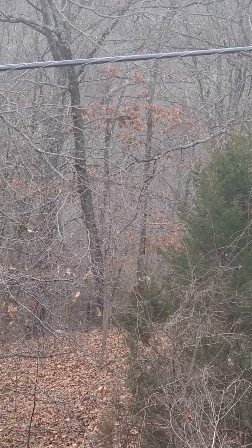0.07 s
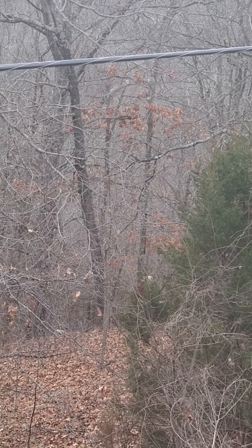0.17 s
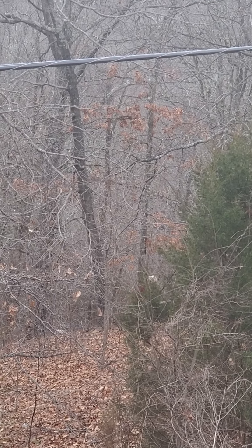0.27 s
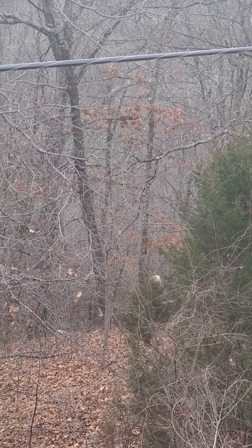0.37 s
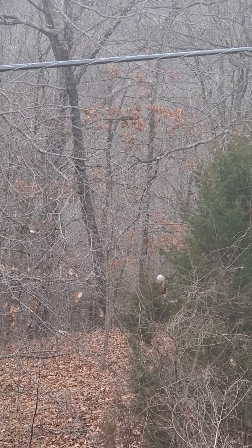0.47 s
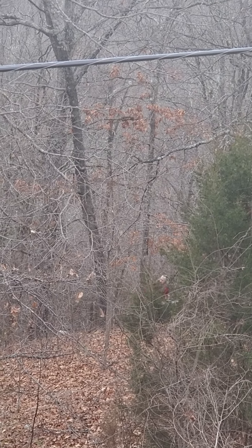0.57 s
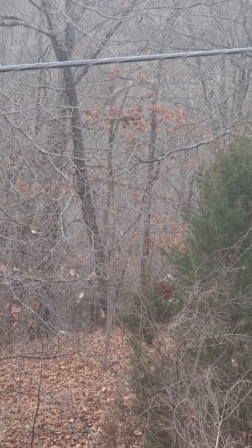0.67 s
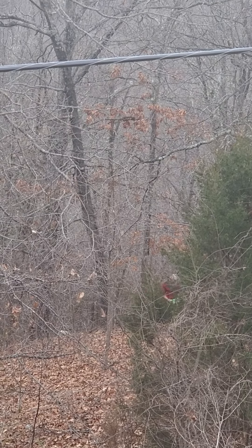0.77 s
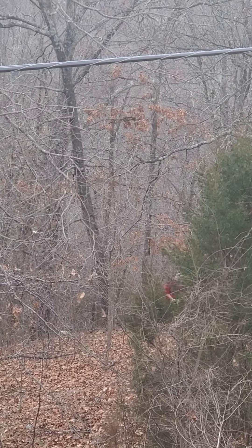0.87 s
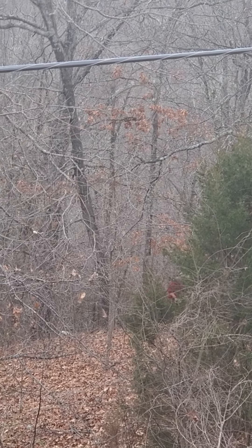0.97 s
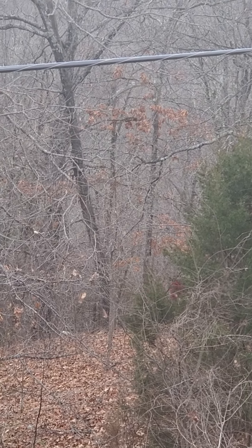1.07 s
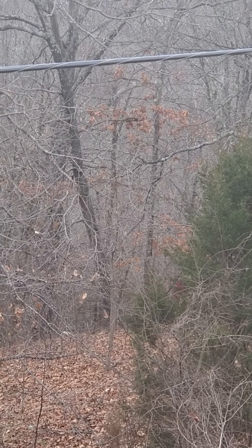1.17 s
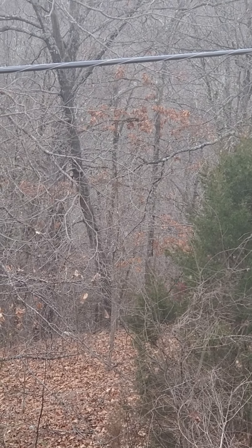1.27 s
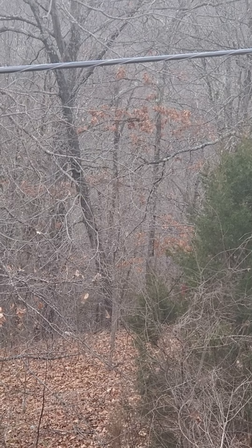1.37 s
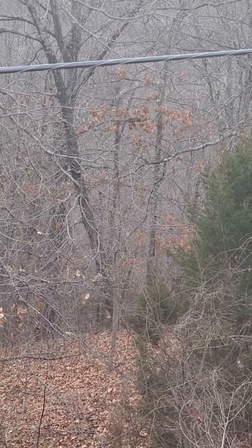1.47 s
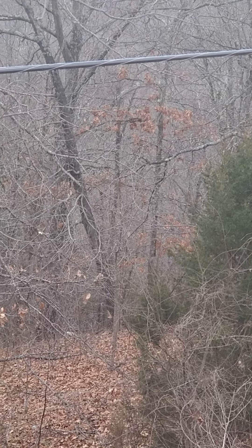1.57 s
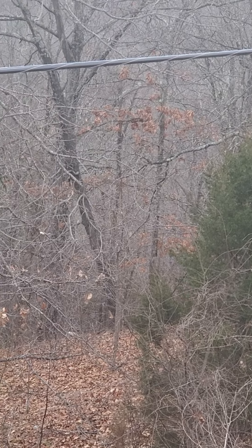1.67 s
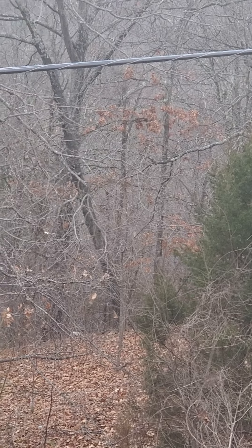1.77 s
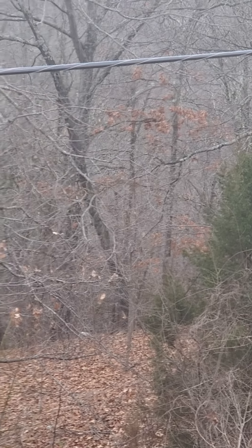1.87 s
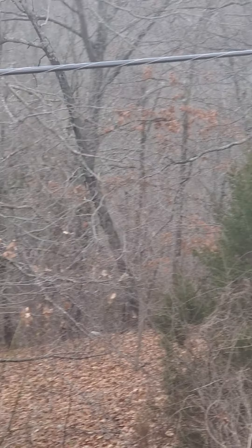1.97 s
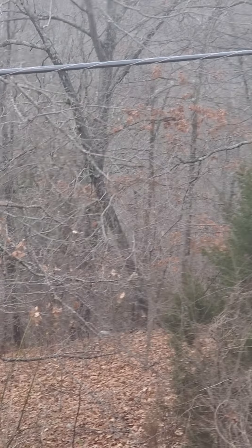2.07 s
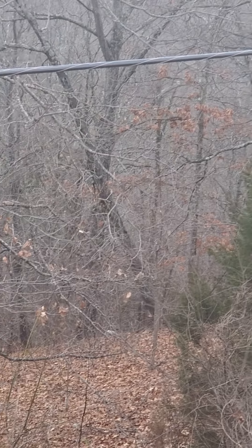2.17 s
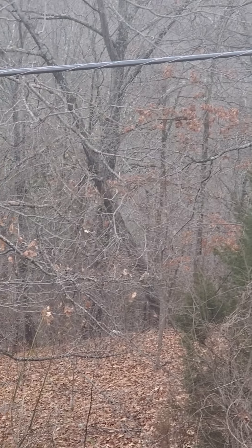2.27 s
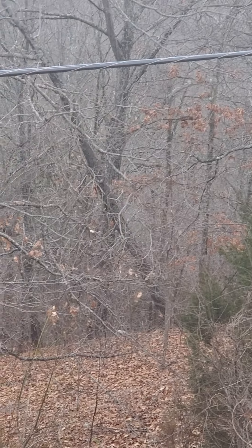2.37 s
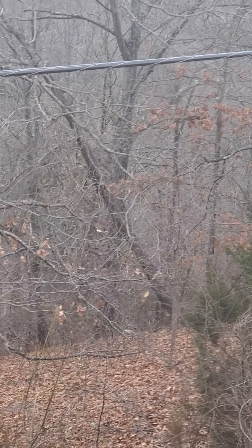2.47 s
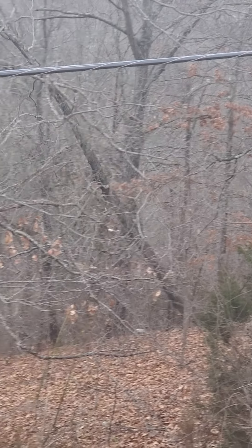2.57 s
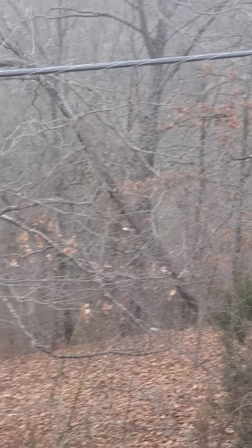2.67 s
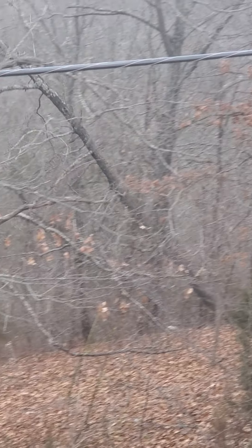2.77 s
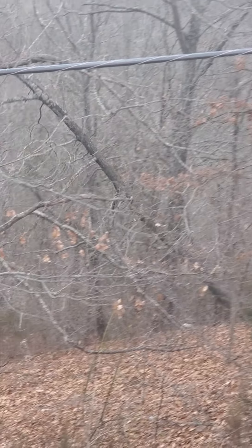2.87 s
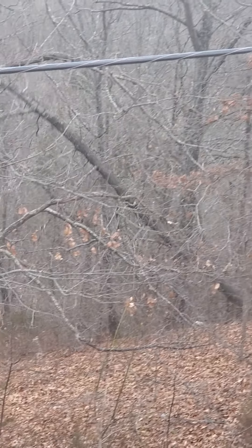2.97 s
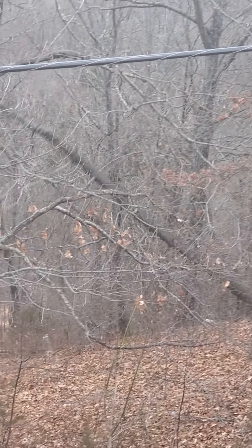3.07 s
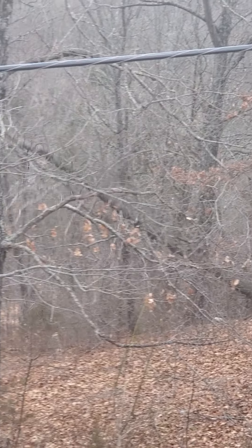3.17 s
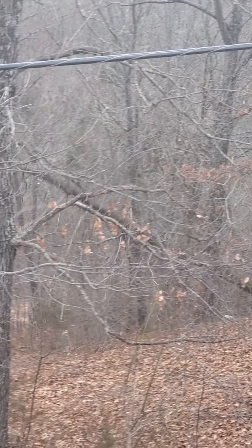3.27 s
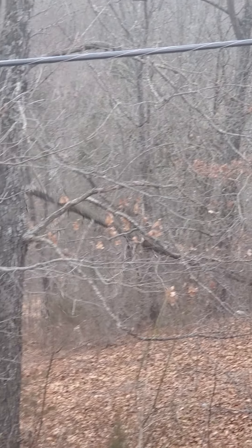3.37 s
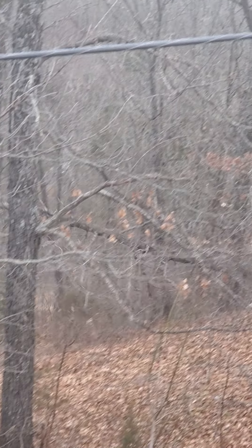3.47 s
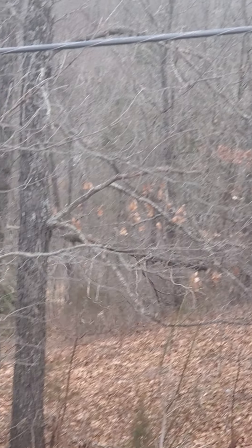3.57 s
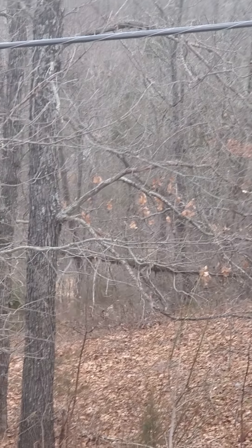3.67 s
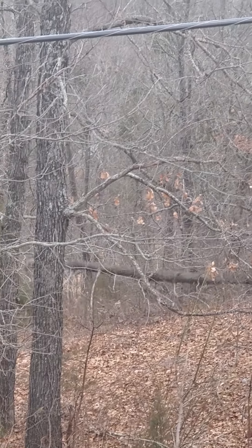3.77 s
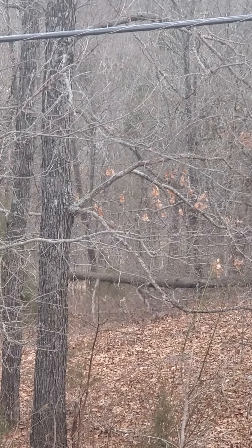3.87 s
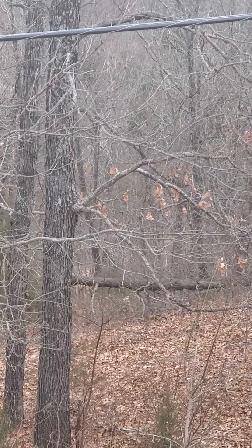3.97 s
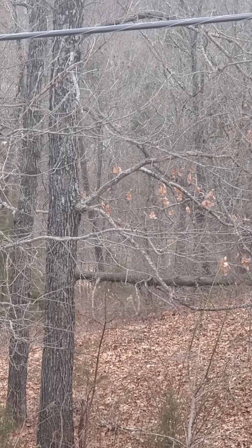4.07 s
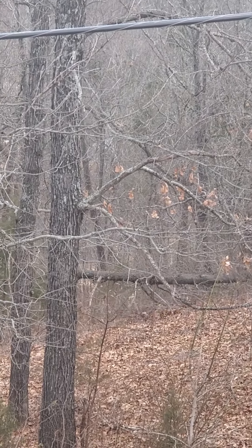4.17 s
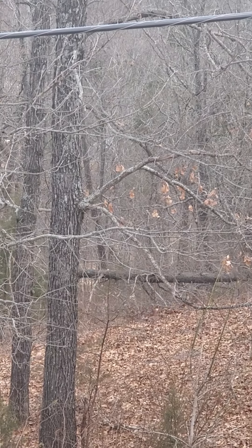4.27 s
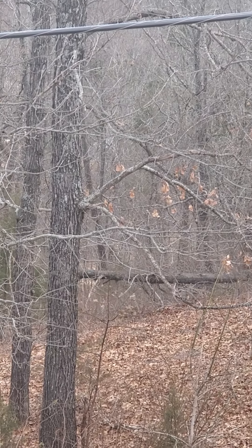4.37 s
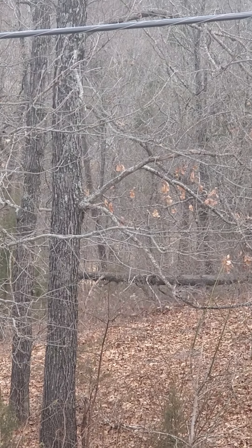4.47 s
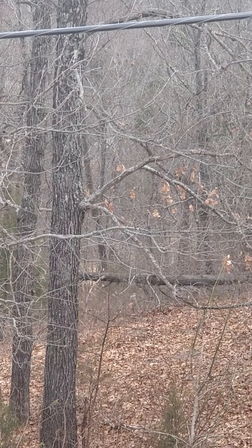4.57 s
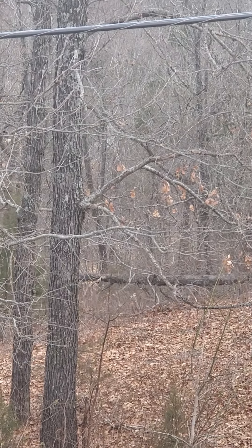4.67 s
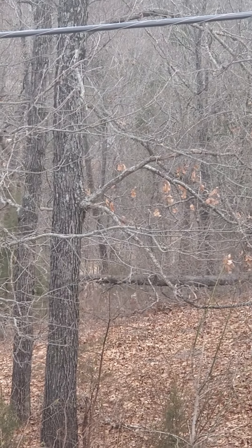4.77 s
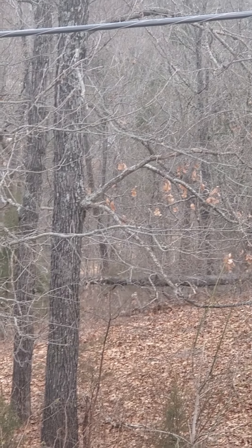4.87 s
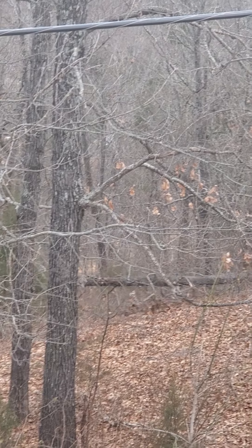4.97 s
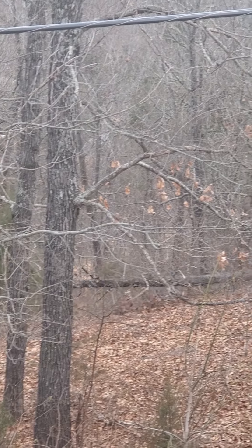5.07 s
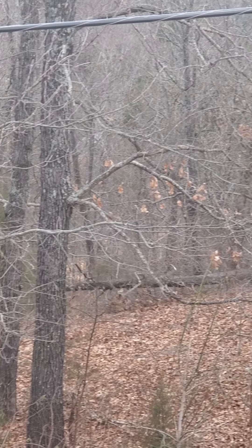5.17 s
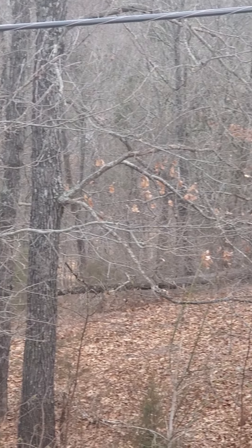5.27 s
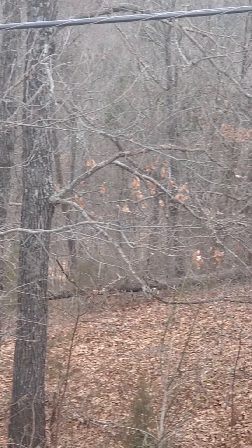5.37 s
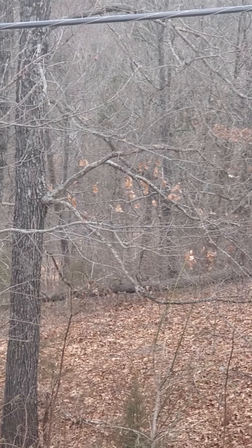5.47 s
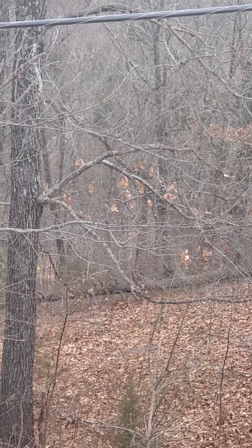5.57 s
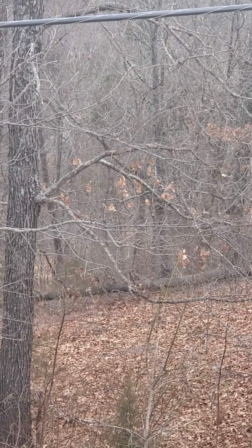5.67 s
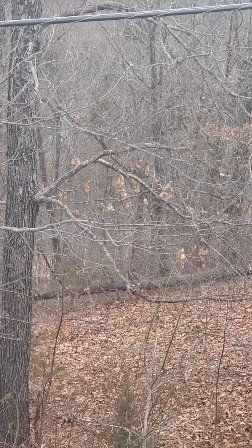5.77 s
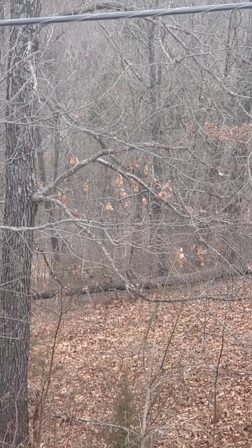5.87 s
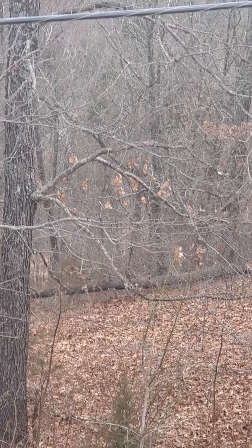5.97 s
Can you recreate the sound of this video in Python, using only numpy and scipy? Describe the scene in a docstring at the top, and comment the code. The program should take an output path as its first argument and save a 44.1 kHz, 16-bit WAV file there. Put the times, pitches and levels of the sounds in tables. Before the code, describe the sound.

Bare winter woods, heard from some distance in stereo, with a low, soft road rumble throughout. At the start the hollow echo of a far knock dies away; dry leaves crunch very faintly up to about 1 s, with two tiny twig ticks. From 1.04 s the trunk cracks: sharp, ringing, irregular snaps with short woodland echoes, over a growing patter of tearing fibres. A short gap in the cracks after 1.85 s, then more from 2.2 s, the hardest at 2.55 s; tearing stops near 2.75 s. Around 3.1-3.3 s the crown brushes lightly through branches. From 3.5 s limbs snap and the first thud lands, swelling to the loudest crash at 3.75-4.1 s: shattering twigs, leaf hiss, knocking boughs, heavy low blows. It drops quickly. A weaker crackling surge follows at 4.4-4.65 s, a strong snap at 4.8 s, smaller snaps from 5.2 s and a last rustling crackle at 5.4-5.6 s, fading.

```python
"""A felled tree goes over in bare winter woods, some way down a slope from a pair of microphones.
The hinge of its trunk cracks fibre by fibre; the crown sweeps through other trees, crashes to the ground and
settles with limbs snapping. Snaps are ringing noise bursts with echoes off the trunks around; crackles are crowds of
small bursts; thuds are short sines over shuddering soil. Dry leaves crunch near the stump, the echo of a far
knock dies away, and filtered noise makes the distant traffic."""
import sys
import numpy as np
from scipy import signal
from scipy.fft import rfft, irfft, next_fast_len
from scipy.io import wavfile
from scipy.ndimage import map_coordinates

SR = 44100
rng = np.random.default_rng(int(sys.argv[2]) if len(sys.argv) > 2 else 0)


def put_to_file(sound):
    """Save the sound as 16-bit audio at rate SR, in the file named by the first command-line argument."""
    columns = np.atleast_2d(sound).T  # one column per channel
    safe = np.clip(columns, -1, 1)
    whole_steps = np.round(safe * 32767)
    wavfile.write(sys.argv[1], SR, whole_steps.astype(np.int16))


N = 265349


def amp(db):
    """Decibels to gain."""
    return 10 ** (np.asarray(db) / 20)


def unit(x):
    """Scale to rms 1, over both channels together."""
    return x / np.sqrt(np.mean(x ** 2) + 1e-20)


def along(points, hz):
    """(Hz, value) points read on a log frequency axis."""
    f, v = np.transpose(points)
    return np.interp(np.log(hz + 1), np.log(f + 1), v)


def wobble(rate, size):
    """A smooth random curve with rate knots a second."""
    knots = rng.standard_normal(int(size * rate / SR) + 4)
    return map_coordinates(knots, [np.arange(size) * rate / SR])


def swell(start, end, rise_db, fall_db):
    """A gain that rises to 1 at start, holds until end and falls; slopes in dB a second."""
    t = np.arange(N) / SR
    before, after = np.maximum(start - t, 0), np.maximum(t - end, 0)
    return amp(-abs(rise_db) * before - abs(fall_db) * after)


def together(levels):
    """Unrelated sounds add in power."""
    return np.sqrt(sum(level ** 2 for level in levels))


def add(out, s, x):
    """Mix x into out from time s."""
    i = max(round(s * SR), 0)
    out[:, i:i + x.shape[1]] += x[:, :max(N - i, 0)]


def filtered(x, response):
    """x times a response of frequency."""
    n = x.shape[-1]
    m = next_fast_len(n + 8192)
    return irfft(rfft(x, m) * response(np.fft.rfftfreq(m, 1 / SR)), m)[..., :n]


def resonance(hz, centre, width):
    """Band-pass response of one damped mode, 1 at its centre."""
    return 1j * hz * width / (centre ** 2 - hz ** 2 + 1j * hz * width)


def coloured(x, spectrum, tilt_db=0, size=2048):
    """Causal filter with this spectrum, tilted by tilt_db an octave between 700 and 7000 Hz."""
    hz = np.fft.rfftfreq(size, 1 / SR)
    octaves = np.log2(np.clip(hz, 700, 7000) / 2500)
    # folding the cepstrum onto positive time gives minimum phase, so attacks stay sharp
    cepstrum = irfft(np.log(amp(along(spectrum, hz) + tilt_db * octaves)))
    cepstrum[1:size // 2] *= 2
    cepstrum[size // 2 + 1:] = 0
    impulse = irfft(np.exp(rfft(cepstrum)))
    return signal.fftconvolve(x, impulse[None], axes=1)[:, :x.shape[1]]


def diffuse(size):
    """White noise arriving from all around, as the two microphones get it."""
    # Likeness of scattered sound at the two microphones. Each row: frequency in Hz, coherence.
    coherence = [(25, 0.34), (70, 0.98), (300, .97), (700, 0.57), (1500, 0.22), (3000, 0.37), (5000, 0.21),
                 (8000, 0.06), (15000, 0.14)]
    turn = lambda hz: np.arccos(np.clip(along(coherence, hz), -1, 1)) / 2
    mid_side = lambda hz: np.array([np.cos(turn(hz)), np.sin(turn(hz))])
    mid, side = filtered(rng.standard_normal((2, size)), mid_side)
    return np.array([mid + side, mid - side])


def rush(spectrum):
    """Diffuse noise of rms 1 with this spectrum."""
    return unit(filtered(diffuse(N), lambda hz: amp(along(spectrum, hz))))


def woods(lumpy_db=1.5, build_s=0.0055, size=32768):
    """A fresh reverberant tail: lumps of sound come back from trunk after trunk, building up over the first ms."""
    # Reverberation of the woods. Each row: frequency in Hz, time to fall by 60 dB in seconds.
    decay_times = [(200, 1), (1200, 0.84), (3500, 0.72), (8000, 0.73), (15000, 0.77)]
    hz, t, z = signal.stft(diffuse(size), SR, nperseg=256)
    decay = amp(-60 * t / along(decay_times, hz)[:, None])
    envelope = decay * (1 - np.exp(-t / build_s))
    tail = signal.istft(z * envelope, SR, nperseg=256)[1][:, :size]
    lumps = amp(lumpy_db * wobble(126.2, size))
    return unit(tail * lumps) / np.sqrt(size)  # mean energy 1 a channel


def fracture(t60, release, scatter_db, size=2048):
    """One break: a sharp release, brief splintering, and scatter from the nearest brush."""
    t = np.arange(size) / SR
    splinters = unit(rng.standard_normal(size) * amp(-60 * t / t60)) / np.sqrt(size)
    splinters[0] += release
    brush = unit(diffuse(size) * amp(-60 * t / 0.14)) / np.sqrt(size)
    return unit(splinters + amp(scatter_db) * brush) / np.sqrt(size)  # mean energy 1 a channel


def woody(x, ring_hz, boost=0.59, q=6):
    """A broken piece rings briefly in its main mode."""
    return filtered(x, lambda hz: 1 + boost * resonance(hz, ring_hz, ring_hz / q))


def snaps(table, spectrum, splinter_t60, release, level_db, woods_db, echo_db, count=176):
    """Single breaks, each with one strong echo and a tail from the woods; level is that of the first 4 ms."""
    # the echo comes from a nearby trunk, each time by a slightly different path
    echo_s, echo_spread, echo_spread_db = 0.0075, 0.2, 1
    # pieces ring, on the whole, a little below their brightness
    ring_ratio, ring_spread = 0.91, 0.18
    out = np.zeros((2, N))
    for (s, db, bright_hz), (ring, detour, loss) in zip(table, rng.standard_normal((len(table), 3))):
        # thicker wood sounds duller, rings lower and takes longer to part
        ring_hz = ring_ratio * bright_hz * np.exp(ring_spread * ring)
        splintering = splinter_t60 * (2550 / bright_hz) ** 2
        burst = woody(fracture(splintering, release, scatter_db=-6), ring_hz, boost=1.3, q=9)
        size = burst.shape[1]
        path = amp(woods_db) * woods()
        path[:, :size] += burst
        delay = round(echo_s * np.exp(echo_spread * detour) * SR)
        path[:, delay:delay + size] += amp(echo_db + echo_spread_db * loss) * burst
        snap = coloured(path, spectrum, tilt_db=6 * np.log2(bright_hz / 2550))
        onset_rms = np.sqrt(np.mean(snap[:, :count] ** 2))
        add(out, s, amp(db + level_db) * snap / onset_rms)
    return out


def crackle(spectrum, rate, spread_db, t60, wash_db, clump_db=0.65, count=12):
    """Countless small breaks of very uneven size, from count places, in clumps over a diffuse wash; rms 1."""
    breaks = np.zeros((2, N))
    for ring_hz in np.geomspace(1200, 6000, count):
        happens = rng.random(N) < rate / count / SR  # rate is breaks a second over all places
        size_db = spread_db * np.minimum(rng.exponential(size=N), 2.7)
        sizes = amp(size_db) * rng.choice([-1, 1], N)
        piece = woody(fracture(t60, release=.5, scatter_db=-3), ring_hz)
        breaks += signal.oaconvolve((happens * sizes)[None], piece, axes=1)[:, :N]
    washed = unit(breaks) + amp(wash_db) * diffuse(N)
    return unit(coloured(washed, spectrum) * amp(clump_db * wobble(55, N)))


def traffic():
    """A far road rumbles as low diffuse noise, gently swelling and growing a little louder at first."""
    # Rumble of the road. Each row: frequency in Hz, relative level in dB per Hz.
    rumble = [(20, -33), (40, -6.5), (62, 0.5), (80, -0.5), (98, 0.5), (125, -3.5), (165, -3), (215, -6.5),
              (300, -10.5), (420, -19), (950, -22), (1400, -37), (2200, -48), (15500, -68)]
    level_db, full_s, rise_db_per_s = -47.5, 1.35, 3
    level = amp(level_db) * swell(full_s, N / SR, rise_db_per_s, 0)
    drift = amp(.7 * wobble(5, N))
    return level * drift * rush(rumble)


def far_knock():
    """The hollow echo of a knock on wood dies away among the trees, as decaying diffuse noise."""
    # Each row: frequency in Hz, relative level in dB per Hz.
    hollow = [(600, -18), (1000, 3), (1500, -11), (1800, -2), (2200, -12), (2500, -16), (6000, -42)]
    t = np.arange(N) / SR
    return amp(-57.0 - 60 * t / 0.67) * rush(hollow)


def litter():
    """Dry leaves crunch faintly near the stump; each scuff swells quickly and dies away."""
    # Scuffs in the leaf litter. Each row: time in seconds, relative level in dB.
    scuff_table = [(0.175, -66.5), (0.33, -69.5), (0.41, -71.5), (0.805, -69), (0.86, -61.5), (1.0, -69)]
    # Colour of the crunch. Each row: frequency in Hz, relative level in dB.
    crunch_colour = [(600, -17), (1800, -1.5), (2300, -4), (3000, -1.5), (4200, 0), (6500, -7.5),
                     (8700, -10), (11000, -21), (15500, -31)]
    rise_db_per_s, fall_db_per_s = 450, 67
    rest_db = -78.5  # between scuffs, on the scale of the table
    scuffs = together(amp(db) * swell(s, s, rise_db_per_s, fall_db_per_s) for s, db in scuff_table)
    crunch = crackle(crunch_colour, rate=350, spread_db=8, t60=.004, wash_db=8)
    return amp(1.5) * together([scuffs, amp(rest_db)]) * crunch


def ground(boughs, thud_hz=97, t60=0.13):
    """The trunk lands in several dull shoves; the soil shudders around each and trembles under the boughs."""
    # Heaviest blows of the trunk on the soil. Each row: time in seconds, relative level in dB.
    blows = [(3.485, -32.5), (3.785, -26.5), (3.825, -38), (3.985, -26.5), (4.026, -30), (4.089, -30.5)]
    # Colour of the shaking soil. Each row: frequency in Hz, relative level in dB per Hz.
    soil_colour = [(20, -38), (38, -17), (58, 3.5), (78, -15), (100, 8.5), (128, -17), (158, 0),
                   (220, -14.5), (400, -25.5), (900, -68)]
    shudder_db, rise_db_per_s, fall_db_per_s = -7.5, 400, 88
    tremble_db = -8  # relative to the boughs
    shudder = together(amp(db + shudder_db) * swell(s, s, rise_db_per_s, fall_db_per_s) for s, db in blows)
    out = together([shudder, amp(tremble_db) * boughs]) * rush(soil_colour)
    t = np.arange(SR // 2) / SR
    for s, db in blows:
        pitch = thud_hz * np.exp(.08 * rng.standard_normal())
        envelope = (1 - np.exp(-t / 0.0018)) * amp(-60 * t / t60)
        shove = np.sin(2 * np.pi * pitch * t) * envelope
        add(out, s, amp(db) * shove[None])
    return out


def hinge():
    """The uncut wood tears: loud cracks over a growing patter of small fibres, until the hinge parts."""
    # Dry wood giving way, two twigs and then the hinge.
    # Each row: time in seconds, relative level in dB, brightness in Hz.
    crack_table = [(0.397, -63, 2000), (0.7928, -61, 3340), (1.0417, -34, 3570), (1.1092, -35.5, 2550),
                   (1.2212, -40.5, 3590), (1.2326, -39.5, 3900), (1.294, -45.5, 3130), (1.3275, -41, 2940),
                   (1.3548, -33.5, 2940), (1.361, -36.5, 2870), (1.427, -42.5, 2680), (1.456, -42, 2210),
                   (1.4992, -33.5, 2680), (1.6076, -37.5, 2450), (1.6494, -40, 2780), (1.7069, -43.5, 2180),
                   (1.8057, -47, 2380), (1.8463, -34.5, 2480), (2.1992, -35, 2100), (2.2221, -34, 2600),
                   (2.314, -41.5, 2020), (2.3304, -39.5, 2160), (2.3885, -39, 2600), (2.4519, -36.5, 2130),
                   (2.5493, -25, 2110), (2.5596, -30.5, 2260), (2.6279, -38, 2470), (2.6568, -38, 2010)]
    # Colour of the cracks. Each row: frequency in Hz, relative level in dB.
    crack_colour = [(120, -27), (300, -8), (650, -16.5), (1150, 0), (1700, -3), (2200, -2.5), (3100, -4),
                    (3700, -6.5), (4600, -3), (5500, -15.5), (8700, -20.5), (11000, -29.5), (15500, -37)]
    # Colour of the tearing fibres. Each row: frequency in Hz, relative level in dB.
    fibre_colour = [(300, -20), (700, -2), (1150, -2.5), (2200, -3), (3100, -2), (4600, -6.5), (5500, -8.5),
                    (8700, -16), (11000, -20.5), (15500, -34)]
    # the hinge tears ever harder as the trunk leans
    start_s, full_s, end_s = 1.045, 2.42, 2.75
    tear_db, rise_db_per_s, fall_db_per_s = -52.5, 6.5, 66
    begun = np.arange(N) / SR > start_s
    tearing = swell(full_s, end_s, rise_db_per_s, fall_db_per_s) * begun
    patter = crackle(fibre_colour, rate=130, spread_db=7, t60=0.0066, wash_db=2.5)
    cracks = snaps(crack_table, crack_colour, splinter_t60=0.021, release=0.46,
                   level_db=-0.5, woods_db=0, echo_db=-7.5)
    return amp(tear_db) * tearing * patter + cracks


def crown_motion():
    """How hard twigs, leaves and boughs are being struck, over all surges of the crown."""
    # The crown brushes its neighbours, touches down, crashes, sags and rolls over.
    # Each row: full from and until in seconds, rise and fall in dB per second (twigs and leaves),
    # then the relative levels of twigs, leaves and boughs in dB.
    surge_table = [(3.06, 3.307, 48, 26, -48.5, -52.5, -59), (3.531, 3.7, 60, 21, -36, -37, -39.5),
                   (3.89, 4.035, 37, 36, -23, -30, -32.5), (4.39, 4.644, 37, 12.5, -40, -48, -52.5),
                   (5.395, 5.596, 19, 27, -38, -46.5, -51.5)]
    haste = 1.31  # heavy boughs start and stop this much faster than twigs
    surges = []
    for start, end, rise, fall, twigs_db, leaves_db, boughs_db in surge_table:
        light = swell(start, end, rise, fall)
        heavy = swell(start, end, haste * rise, haste * fall)
        surges.append(np.array([amp(twigs_db) * light, amp(leaves_db) * light, amp(boughs_db) * heavy]))
    return together(surges)


def crown(twigs, leaves, boughs):
    """Twigs shatter, dry leaves hiss, thick boughs knock and limbs snap as the crown sweeps down and settles."""
    # Limbs breaking. Each row: time in seconds, relative level in dB, brightness in Hz.
    limb_table = [(3.5042, -25.5, 2400), (3.541, -35, 2780), (3.7496, -21, 2950), (3.83, -20.5, 2080),
                  (3.9128, -18.5, 2190), (3.9973, -19.5, 2880), (4.0659, -16, 3050), (4.1255, -25.5, 2560),
                  (4.8012, -22, 2250), (4.8398, -31.5, 2820), (4.903, -34, 2900), (5.2054, -33, 3200),
                  (5.2776, -32.5, 3020), (5.4208, -34, 2300), (5.5566, -32, 2430)]
    # Colours of limbs, twigs, leaves and boughs. Each row: frequency in Hz, relative level in dB.
    limb_colour = [(200, -23), (500, -14), (750, -12), (1200, -4), (2000, 0.5), (2900, 0.5), (3800, -6.5),
                   (4700, -5), (6000, -16.5), (8000, -23.5), (11000, -22), (15500, -57)]
    twig_colour = [(300, -12.5), (700, -18.5), (1050, -7), (1800, -6), (2900, -1.5), (3850, -7),
                   (4650, -10), (5900, -14), (8000, -26), (11000, -23.5), (15500, -47)]
    leaf_colour = [(1500, -18), (3000, -15), (4600, 11), (7000, 2.5), (8200, -0.5), (10000, 0),
                   (12000, -2.5), (15500, -6.5)]
    bough_colour = [(100, -20), (200, -8.5), (280, -1), (400, -0.5), (560, 0.5), (750, -1.5), (1400, -7.5),
                    (2500, -12.5), (6000, -46)]
    shatter = crackle(twig_colour, rate=460, spread_db=4.2, t60=.008, wash_db=2)
    hiss = crackle(leaf_colour, rate=600, spread_db=5, t60=.003, wash_db=3, clump_db=1.3)
    knocks = crackle(bough_colour, rate=180, spread_db=1.0, t60=0.0086, wash_db=0.5)
    bed = twigs * shatter + leaves * hiss + boughs * knocks
    limbs = snaps(limb_table, limb_colour, splinter_t60=0.014, release=0.3,
                  level_db=0.5, woods_db=-1.5, echo_db=-11.5)
    return bed + limbs


def scene():
    """All sources together, from the far road to the falling tree."""
    twigs, leaves, boughs = crown_motion()
    background = traffic() + far_knock() + litter()
    return background + ground(boughs) + hinge() + crown(twigs, leaves, boughs)


def record(dry, lag_s=.00002, gain_db=-2):
    """The camera body rings a little and shades its microphones; the right one is nearer and mostly less shaded."""
    # Resonances of the camera body and its ports. Each row: centre in Hz, width in Hz, boost in dB.
    body_modes = [(535, 85, 4), (950, 65, 4.5), (1250, 43, 1.5), (1777, 94, 5.5), (2046, 47, 1.5),
                  (2887, 220, 4), (3216, 112, 6), (4600, 830, 1.5), (5850, 260, 4.5), (6930, 500, 3.5),
                  (8530, 290, 2.5), (11300, 310, 2.5)]
    # Shading by the camera body. Each row: frequency in Hz, left minus right in dB.
    shading = [(60, -1), (500, -1.6), (700, 1.5), (1000, -2.5), (3100, -1.2), (4550, -9.5), (5300, -4),
               (7800, -2), (9800, -5), (12300, -5), (14200, 1.5)]
    top_hz = 15900  # nothing is kept above
    sides = np.array([[.5], [-.5]])  # left, right
    body = lambda hz: 1 + sum((amp(db) - 1) * resonance(hz, centre, width) for centre, width, db in body_modes)
    shade = lambda hz: amp(sides * along(shading, hz)) * np.exp(-2j * np.pi * hz * lag_s * sides)
    return amp(gain_db) * filtered(dry, lambda hz: body(hz) * shade(hz) * (hz < top_hz))


dry = scene()
out = record(dry)
put_to_file(out)
```